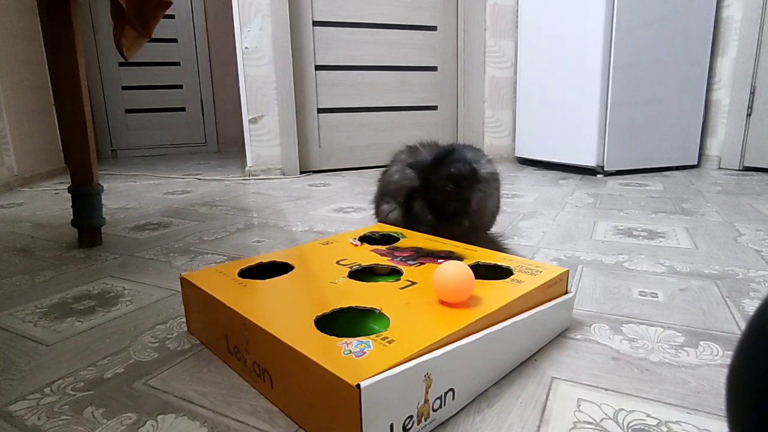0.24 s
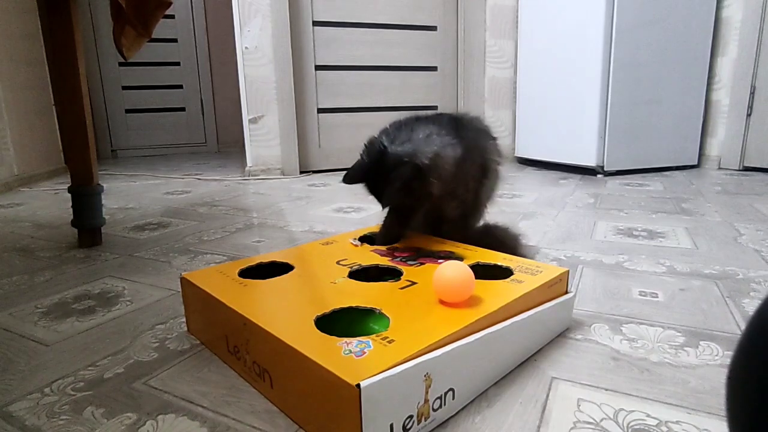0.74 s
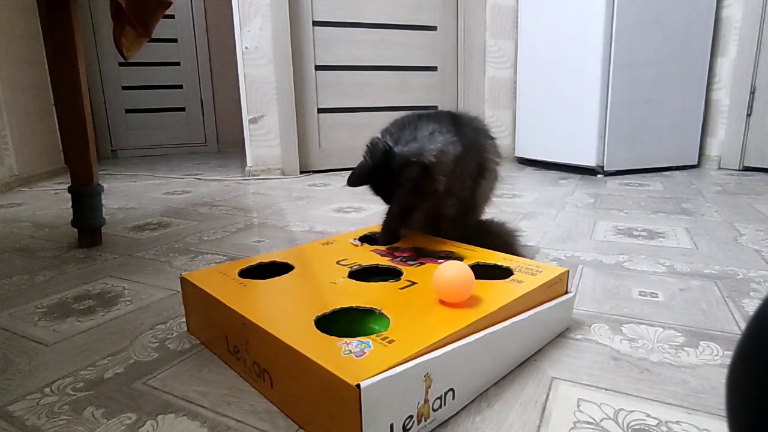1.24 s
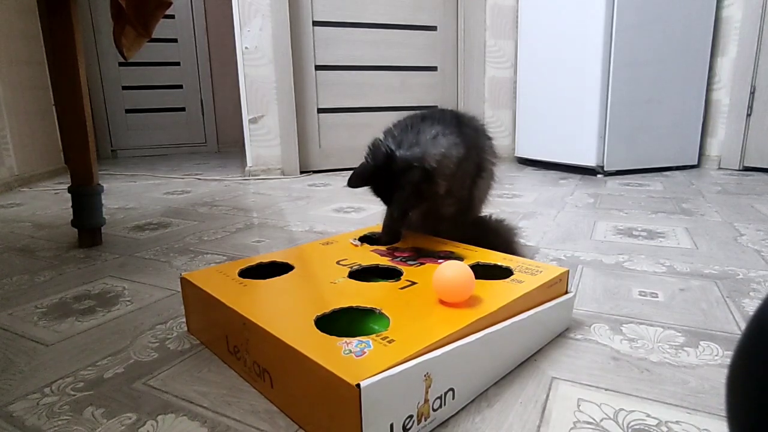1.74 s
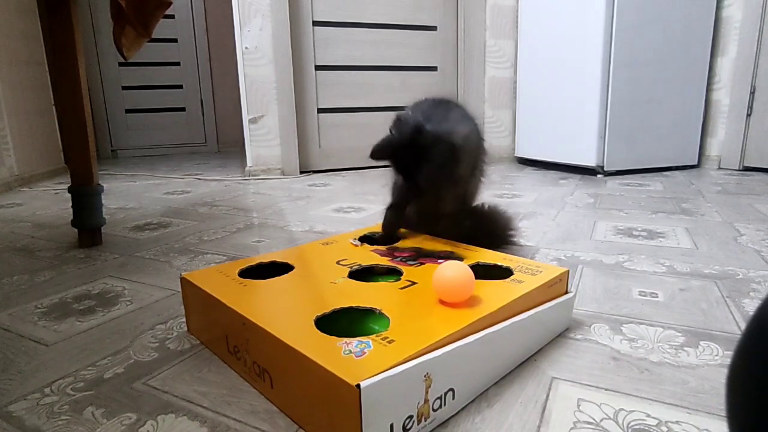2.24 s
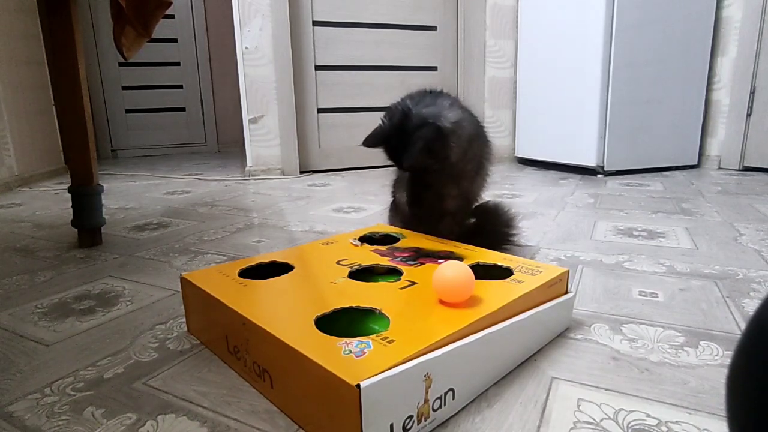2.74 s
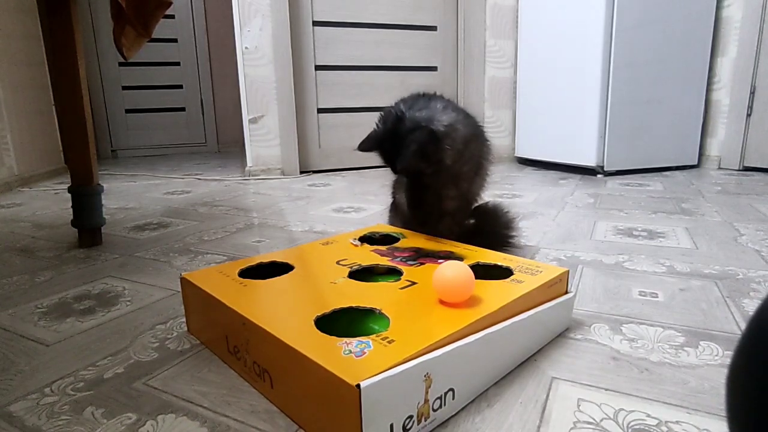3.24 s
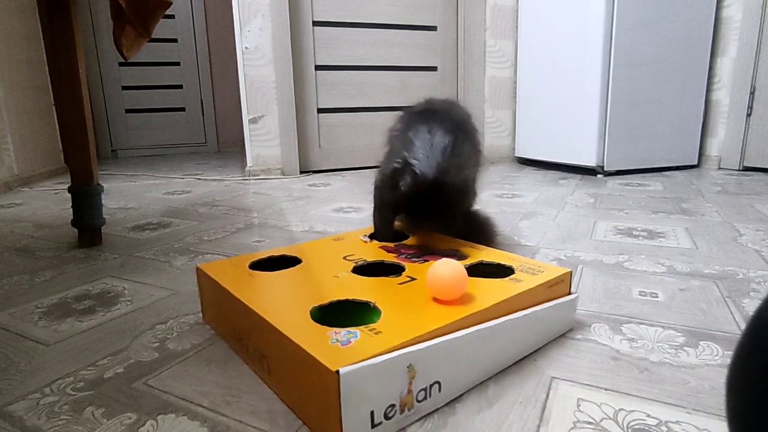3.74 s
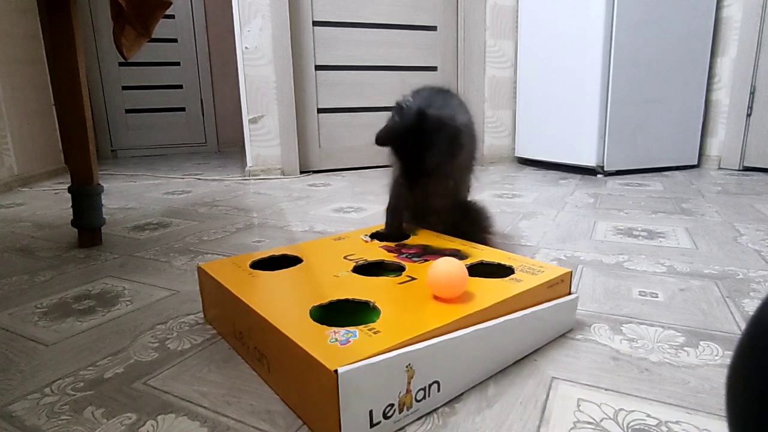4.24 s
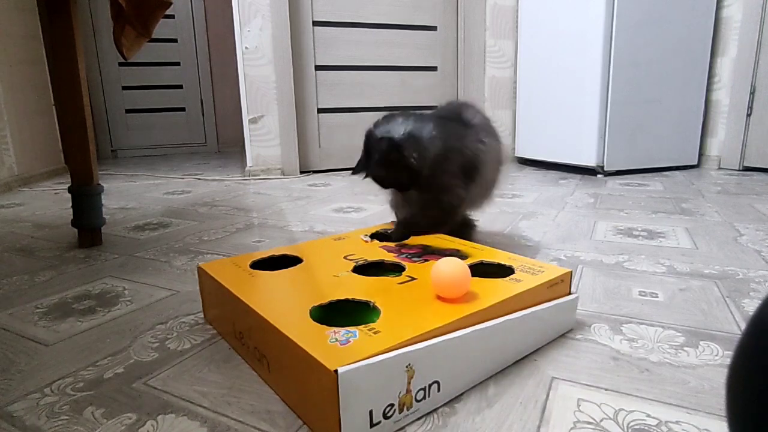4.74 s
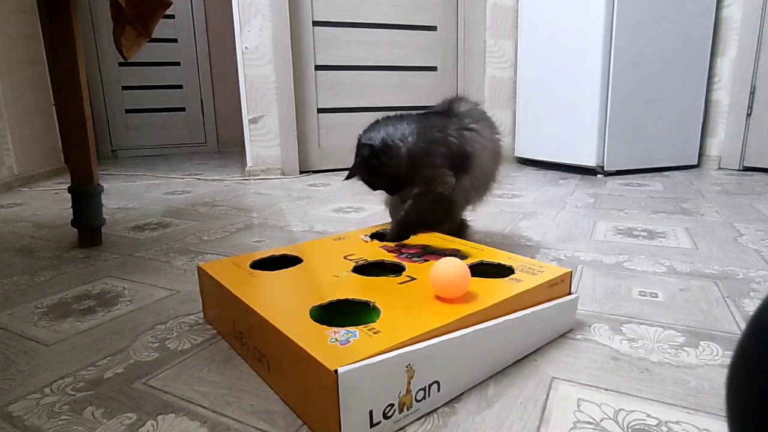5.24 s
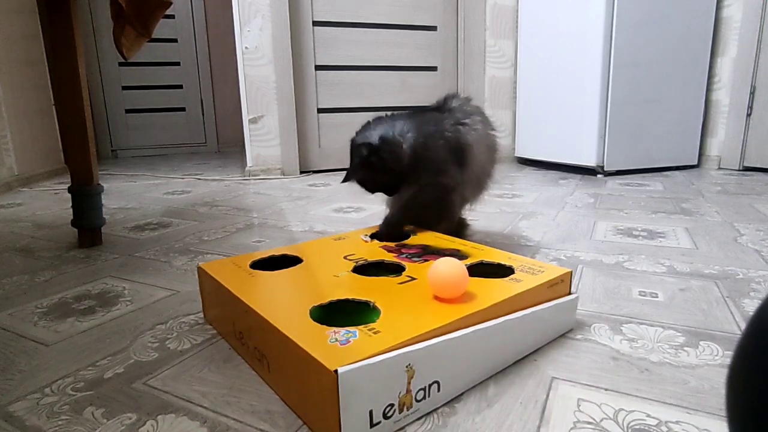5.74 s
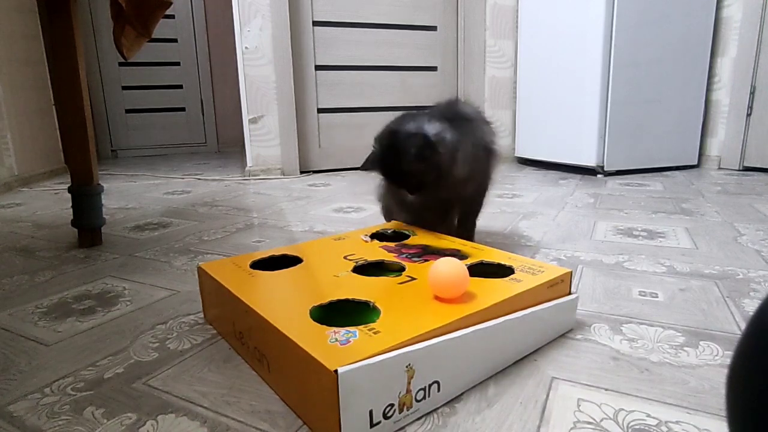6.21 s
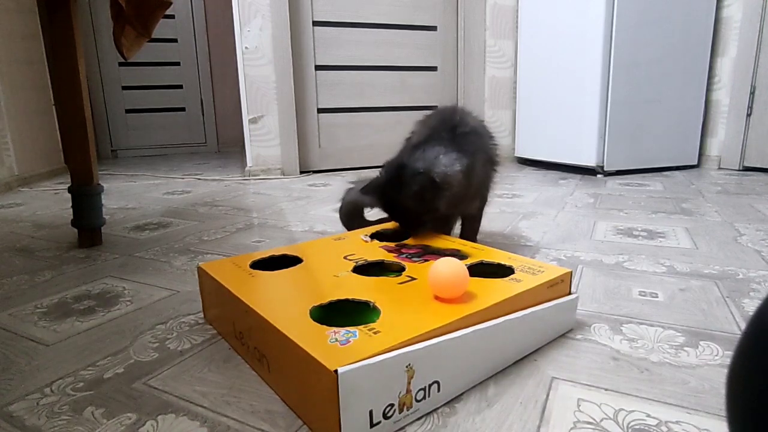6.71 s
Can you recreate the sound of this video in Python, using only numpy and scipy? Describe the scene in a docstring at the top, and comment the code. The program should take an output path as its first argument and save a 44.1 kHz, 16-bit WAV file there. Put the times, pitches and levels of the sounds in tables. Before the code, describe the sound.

A kitten paws at a cardboard box in a bare room, making light irregular taps, soft brushes and brief scratches.

```python
"""On the floor of a bare room, close by, a kitten paws at a flat cardboard box.
Each blow is an impulse that excites the damped modes of the box, scuffs the card and leaves it shivering.
Stick-slip friction sounds as the paw brushes the lid and once shoves the box along the floor; claws
crack free of the card and soft pads thump. The room reverberates over a quiet hiss and rumble."""
import sys
import numpy as np
from scipy import signal
from scipy.fft import rfft, irfft
from scipy.io import wavfile

SR = 44100
rng = np.random.default_rng(int(sys.argv[2]) if len(sys.argv) > 2 else 0)


def pcm_store(signal):
    """Save signal as 16-bit PCM."""
    levels = np.round(np.clip(np.atleast_2d(signal), -1, 1) * 32767)
    wavfile.write(sys.argv[1], SR, levels.astype(np.int16).T)


N = 307377


def gain_of(db):
    """Amplitude ratio of a level in decibels."""
    return 10 ** (np.asarray(db) / 20)


def unit_rms(x):
    """Normalisation to an rms of 1."""
    return x / np.sqrt(np.mean(x ** 2) + 1e-20)


def curve_at(points, hz, column=1):
    """Linear interpolation of a table column over log frequency."""
    table = np.array(points, float)
    return np.interp(np.log(hz + 1), np.log(table[:, 0] + 1), table[:, column])


def add(mix, start_s, sound):
    """Superposition of a sound on the mix."""
    part = mix[..., round(start_s * SR):][..., :sound.shape[-1]]
    part += sound[..., :part.shape[-1]]


def colour(x, db_at, size=4096):
    """Minimum-phase filtering by the magnitude response db_at(hz)."""
    log_gain = np.log(gain_of(db_at(abs(np.fft.fftfreq(size, 1 / SR)))))
    taps = np.fft.ifft(np.exp(np.conj(signal.hilbert(log_gain)))).real
    return signal.oaconvolve(x, taps[:size // 2])[:len(x)]


# Spectrum of the background noise: frequency_hz, density_db
AIR_SPECTRUM = [(8, -67), (22, -76), (45, -83.5), (100, -90.5), (200, -93.5), (400, -101), (1100, -106),
                (3000, -108.5), (7000, -110.5), (14000, -111)]
# Its likeness between left and right: frequency_hz, correlation
AIR_CORRELATION = [(20, 0.092), (70, 0.3), (160, 0.16), (400, 0.31), (1000, 0.04), (3000, 0.017)]
def air(level_db=-54.5):
    """Ambient noise: steady rumble and hiss, partly correlated between the two sides."""
    hz = np.fft.rfftfreq(N, 1 / SR)
    left, independent = rfft(rng.standard_normal((2, N)))
    shared = curve_at(AIR_CORRELATION, hz)
    right = shared * left + np.sqrt(1 - shared ** 2) * independent
    noise = irfft(np.array([left, right]) * gain_of(curve_at(AIR_SPECTRUM, hz)), N)
    return gain_of(level_db) * unit_rms(noise) * gain_of([[-.6], [.6]])


# Reverberation by band: frequency_hz, t60_s, level_db
REVERB_BANDS = [(100, 0.36, -4), (254, 0.53, -3.5), (594, 0.48, -6.5), (900, 0.37, -4), (1370, 0.38, -2.5),
                (2700, 0.35, 2), (7050, 0.49, -2.5), (14300, 0.33, -5.5)]
def diffuse_tail(shared_below_hz=450):
    """Diffuse field: dense reflections decay exponentially, each band at its own rate."""
    hz, t, (left, independent) = signal.stft(rng.standard_normal((2, SR)), SR, nperseg=256)
    hz = hz[:, None]
    shared = 1 / (1 + (hz / shared_below_hz) ** 2)  # long waves reach both sides alike
    right = shared * left + np.sqrt(1 - shared ** 2) * independent
    rate = np.log(1000) / curve_at(REVERB_BANDS, hz)
    envelope = gain_of(curve_at(REVERB_BANDS, hz, column=2)) * np.sqrt(2 * rate / SR) * np.exp(-rate * t)
    return signal.istft(np.array([left, right]) * envelope, SR, nperseg=256)[1][:, :SR]


# Resonances of the room: pitch_hz, left_db, right_db
ROOM_MODES = [(209, -14, -2), (216.6, 9, 5.5), (299.3, 7, 13.5), (355, 11.5, -1), (448, -12, -14),
              (452, 5, -21), (485, -5, -19), (580, 8.5, -11), (582, 1, -11), (618, 5, -11), (662, -10, -19),
              (677, 4, -5), (887, -26, -0.5), (1030, -13, 6), (1134, 0, -6), (1137, -22, -4),
              (1225, 5, -20), (1410, -25, 9)]
def standing_waves(t, t60_factor=1.2):
    """Normal modes of the room ring a little longer than its diffuse field."""
    out = np.zeros((2, len(t)))
    for k, (hz, left_db, right_db) in enumerate(ROOM_MODES):
        rate = np.log(1000) / (t60_factor * curve_at(REVERB_BANDS, hz))
        wave = 2 * rate / SR * np.exp(-rate * t) * np.sin(2 * np.pi * hz * t)
        out += (-1) ** k * gain_of([[left_db], [right_db]]) * wave  # neighbours in antiphase
    return out


# Early reflections from floor and furniture: delay_ms, left_gain, right_gain
REFLECTIONS = [(4.6, 0.045, 0.01), (9.6, 0.17, 0.054), (11.3, 0.03, 0.12), (17.8, .03, 0.25)]
def room(direct, build_s=0.0012, tails=6, crossfade_s=0.3):
    """Reverberation: reflections, standing waves and a tail that changes as the kitten shifts about."""
    t, wet = np.arange(SR) / SR, np.zeros((2, N))
    build = 1 - np.exp(-(t / build_s) ** 2)
    place = np.arange(N) / SR / crossfade_s
    for k in range(tails):
        distance = abs((place - k) % tails - tails / 2)
        weight = np.cos(np.pi / 2 * np.minimum(distance, 1))  # equal-power crossfade
        wet += signal.fftconvolve(direct * weight, diffuse_tail() * build, axes=1)[:, :N]
    wet += signal.fftconvolve(direct, standing_waves(t) * build, axes=1)[:, :N]
    for delay_ms, left, right in REFLECTIONS:
        add(wet, delay_ms / 1000, direct * np.array([[left], [right]]))
    return direct + wet


# Soft pads landing: start_s, peak_db, pitch_hz
FOOTFALLS = [(2.305, -53.5, 390), (3.843, -49, 219), (3.882, -46.5, 347), (3.961, -46.5, 380),
             (4.018, -47.5, 205), (4.070, -52, 226)]
def footfalls(swell_s=0.0029):
    """Soft impact: each pad gives a dull thump, damped within a few cycles."""
    out, t = np.zeros(N), np.arange(SR // 10) / SR
    envelope = t / swell_s * np.exp(1 - t / swell_s)
    for start_s, db, hz in FOOTFALLS:
        add(out, start_s, gain_of(db) * envelope * np.sin(2 * np.pi * hz * t))
    return out


def friction(spectrum, slips_per_s, spread_db, clump_db, clump_hz=110):
    """Stick-slip friction: a dense train of tiny clicks, stronger where the paw drags."""
    size = gain_of(spread_db * np.minimum(rng.exponential(1, N), 4))
    slips = size * rng.choice([-1, 1], N) * (rng.random(N) < slips_per_s / SR)
    lowpass = signal.butter(2, clump_hz, fs=SR, output="sos")
    drag = unit_rms(signal.sosfilt(lowpass, rng.standard_normal(N)))
    slips *= gain_of(clump_db * np.clip(drag, -2, 2))
    return unit_rms(colour(slips, lambda hz: curve_at(spectrum, hz)))


# Friction spectra of swishing fur, rasping claws and the drumming lid: frequency_hz, density_db
FUR_SPECTRUM = [(300, -34), (1500, -21), (4800, -17.5), (7000, -12), (9000, -3), (10600, -4.5), (12500, -8),
                (14400, -16.5)]
CLAW_SPECTRUM = [(300, -45), (1500, -5), (3400, -6), (5000, -2), (6800, 2.5), (9500, 0.5), (12000, -7.5),
                 (14400, -7.5)]
LID_SPECTRUM = [(40, -27), (130, -8.5), (330, 0), (560, -5), (830, -4.5), (1100, -11.5), (1800, -15.5),
                (2700, -18.5), (4500, -26.5), (14000, -70)]
def rubbing(power):
    """Friction noise of fur, claws and lid: each amplitude is the square root of its row of power."""
    fur = np.array([friction(FUR_SPECTRUM, 7000, spread_db=2.5, clump_db=1.5) for _ in range(2)])
    claws = np.array([friction(CLAW_SPECTRUM, 3200, spread_db=6.0, clump_db=2.5) for _ in range(2)])
    lid = friction(LID_SPECTRUM, 4000, spread_db=1.0, clump_db=3.5)
    fur_gain, claw_gain, lid_gain = np.sqrt(power)
    return (fur * fur_gain + claws * claw_gain) * gain_of([[-.5], [0]]) + lid * lid_gain


def stroke_power(peak_s, levels_db, rise_s, fall_s, hold_s=0):
    """Friction noise power goes as speed squared; the speed rises, holds and falls. One row per level."""
    t = np.arange(N) / SR
    decay = np.maximum((peak_s - t) / rise_s, (t - peak_s - hold_s) / fall_s)
    speed = np.exp(-np.clip(decay, 0, 20))
    return (speed * gain_of(levels_db)[:, None]) ** 2


# Paw strokes over the card: peak_s, length_s, fur_db, lid_above_fur_db
BRUSH_STROKES = [(0.769, 0.072, -53, -5), (1.158, 0.13, -66, -5), (1.390, 0.27, -63.5, -13),
                 (1.691, 0.032, -46, -3), (2.064, 0.04, -54, -4), (2.170, 0.11, -65.5, 0),
                 (2.312, 0.085, -51.5, -8.5), (4.209, 0.04, -50.5, -2.5), (4.275, 0.13, -56, -4),
                 (4.892, 0.075, -62.5, -13.5), (5.13, 0.15, -58.5, -14), (5.396, 0.092, -58.5, -12.5),
                 (5.465, 0.03, -56.5, 1), (5.598, 0.064, -52, -9), (5.710, 0.047, -63, -8),
                 (5.804, 0.025, -52.5, -4), (5.855, 0.09, -56.5, -16)]
def brush_power(rise_share=0.46, claws_above_fur_db=-14):
    """Sliding friction: fur sweeps the card and drives the lid, the claws trailing lightly."""
    power = np.zeros((3, N))
    for peak_s, length_s, fur_db, lid_above_fur_db in BRUSH_STROKES:
        levels_db = (fur_db, fur_db + claws_above_fur_db, fur_db + lid_above_fur_db)
        rise_s = length_s * rise_share
        power += stroke_power(peak_s, levels_db, rise_s, fall_s=length_s - rise_s)
    return power


def shove_power(start_s=3.749):
    """Static friction yields to sliding friction: the box jerks free, slides on and stops."""
    jerk = stroke_power(start_s, (-43.5, -42, -41.5), rise_s=0.002, fall_s=0.039)
    slide = stroke_power(start_s, (-53, -58, -58.5), rise_s=0.002, fall_s=0.035, hold_s=0.21)
    return jerk + slide


# Claws catching on the card: start_s, strength_db
CLAW_CATCHES = [(1.0757, -44.5), (1.347, -47), (1.6838, -30), (1.6896, -26), (3.747, -23), (3.778, -25),
                (3.8266, -22), (4.21, -31.5), (4.24, -28), (5.153, -39)]
def claw_cracks(decay_s=0.0015):
    """Sudden release: a claw snaps free of the card in a brief broadband transient."""
    out, t = np.zeros((2, N)), np.arange(SR // 100) / SR
    for start_s, db in CLAW_CATCHES:
        crack = rng.standard_normal((2, len(t))) * np.exp(-t / decay_s)
        add(out, start_s, gain_of(db) * crack)
    bright = [colour(side, lambda hz: (curve_at(FUR_SPECTRUM, hz) + curve_at(CLAW_SPECTRUM, hz)) / 2)
              for side in out]
    return np.array(bright) * gain_of([[-2.5], [0]])


# Paw blows on the lid: start_s, strength_db, pitch_ratio, rim_lift_db, scuff_db
BLOWS = [(1.6832, -15.5, 1.0, 3.5, -46), (1.7726, -22, 1.06, 5.5, -53), (2.1381, -27, 1.006, 3, -70),
         (3.7467, -25, 1.18, 2, -43), (3.7522, -28.5, 1.04, -6, -55), (3.8124, -26.5, 1.11, 1, -62),
         (4.2129, -25.5, 1.28, 16.5, -51), (4.2397, -18, 1, 6, -39.5), (4.2664, -23.5, 1.063, -1, -64),
         (5.132, -34, 0.81, 5, -68), (5.153, -17.5, 1.025, 4, -42.5), (5.4676, -26, 1.0, 0, -59),
         (5.8047, -27, 0.99, 2, -54.5)]
def skid_power(lag_s=0.0032, rise_s=0.0044):
    """Friction after impact: the paw skids as it lands, and the loose card shivers on."""
    power = np.zeros((3, N))
    for start_s, blow_db, _, _, scuff_db in BLOWS:
        peak_s = start_s + lag_s
        fur_db, lid_db, shiver_db = scuff_db - 9, blow_db - 24.5, blow_db - 38.5
        power += stroke_power(peak_s, (fur_db, scuff_db, lid_db), rise_s, fall_s=0.0067)
        power[-1:] += stroke_power(peak_s, [shiver_db], rise_s, fall_s=0.068)  # lid only
    return power


# Heavily damped modes of the box: pitch_hz, t60_s, left_db, right_db
BOX_MODES = [(107, 0.034, -14.5, -13), (280.6, 0.067, -24.5, -28), (476, 0.083, -16.5, -50),
             (603.5, 0.026, -12, 0.5), (678, 0.021, 1, 1), (796, 0.017, -5, -2), (923, 0.015, -5, -12),
             (1053, 0.017, -32, -7.5), (1440, 0.023, -40, -21.5), (1700, 0.014, -34, -16),
             (2250, 0.0083, -44, -28), (2850, 0.0096, -16, -34)]
def knocks(contact_s=0.00015, rim_hz=850, onset_cycles=0.7):
    """Modal response to a force pulse: each blow rings the box, more brightly near the stiff rim."""
    out, t = np.zeros((2, N)), np.arange(SR // 10) / SR
    force = t * np.exp(-t / contact_s)
    for start_s, blow_db, pitch_ratio, rim_lift_db, _ in BLOWS:
        ring = np.zeros((2, len(t)))
        for hz, t60_s, left_db, right_db in BOX_MODES:
            size = gain_of([[left_db], [right_db]]) * gain_of(rim_lift_db * (hz > rim_hz))
            cycles = hz * pitch_ratio * t
            onset = 1 - np.exp(-cycles / onset_cycles)  # short bending waves cross the lid first
            ring -= size * onset * np.exp(-np.log(1000) * t / t60_s) * np.sin(2 * np.pi * cycles)
        add(out, start_s, gain_of(blow_db) * signal.fftconvolve(ring, force[None] / force.sum()))
    return out


def scene():
    """Superposition: the kitten's sounds excite the room, over its ambient noise."""
    friction_power = shove_power() + brush_power() + skid_power()  # incoherent sources add in power
    left, right = knocks() + rubbing(friction_power) + claw_cracks() + footfalls()
    left = np.roll(left, 2)  # the left side hears the kitten two samples later
    return room(np.array([left, right])) + air()


# Treble peaks and dips of the microphone ports, left then right: centre_hz, width_hz, gain_db
PORT_RESONANCES = [
    [(10880, 1250, 5), (8500, 1200, -3)],
    [(8850, 1330, 6), (12100, 4500, -3)],
]
def record(dry, cutoff_hz=14330):
    """Resonance in each microphone port colours the treble; a low-pass filter limits the band."""
    heard = []
    for side, port in zip(dry, PORT_RESONANCES):
        heard.append(colour(side, lambda f: sum(db / (1 + (2 * (f - hz) / width_hz) ** 2)
                                                for hz, width_hz, db in port)))
    lowpass = signal.firwin(511, cutoff_hz, window=("kaiser", 9), fs=SR)
    return signal.oaconvolve(np.array(heard), lowpass[None], "same")


dry = scene()
out = record(dry)
pcm_store(out)
```